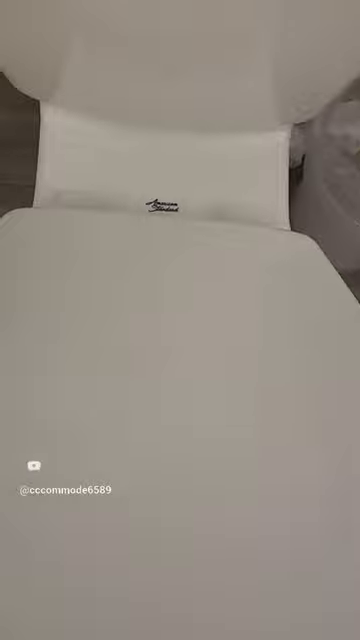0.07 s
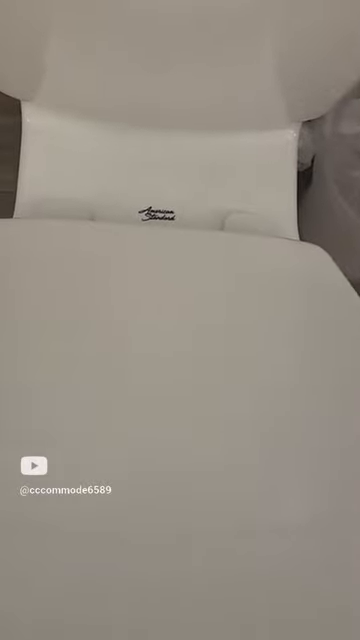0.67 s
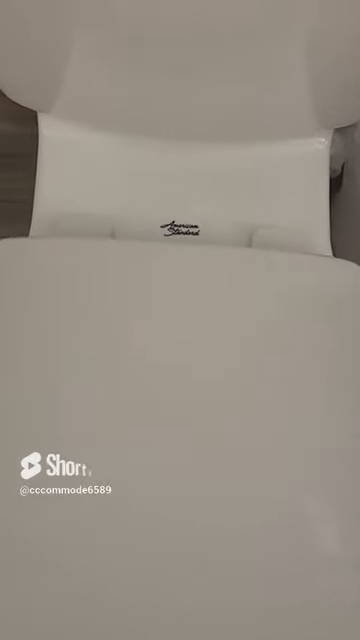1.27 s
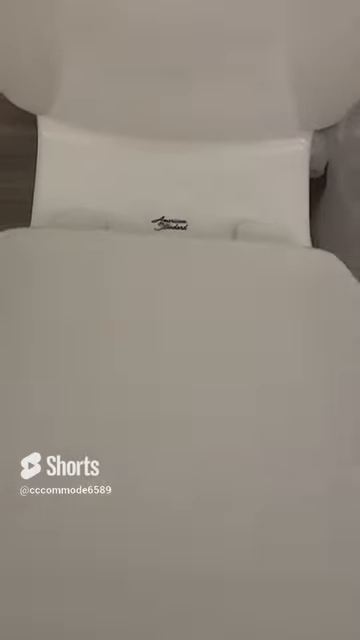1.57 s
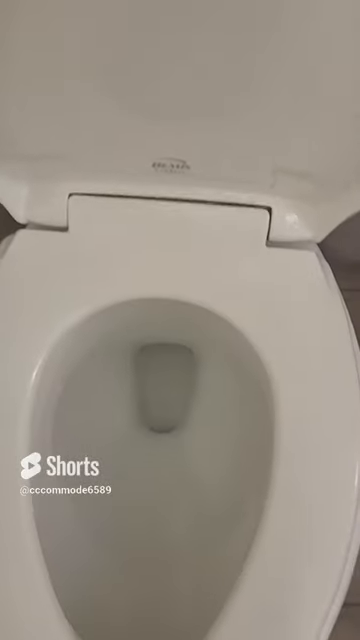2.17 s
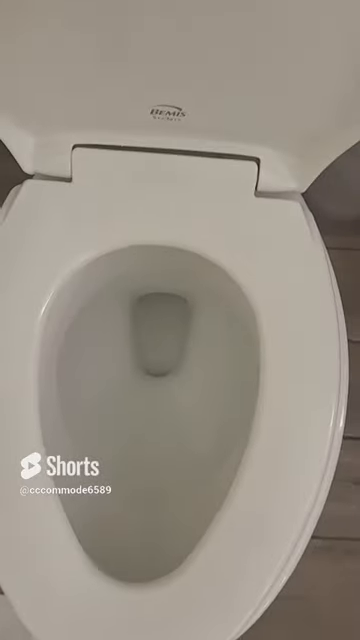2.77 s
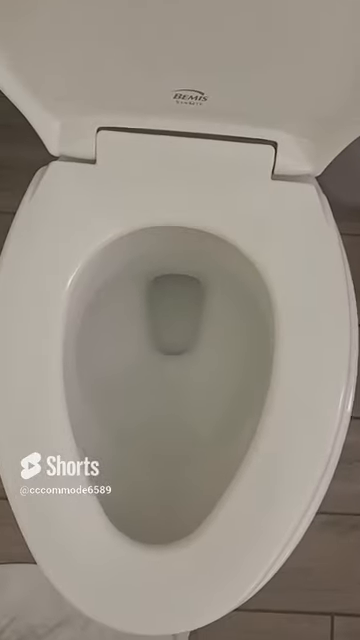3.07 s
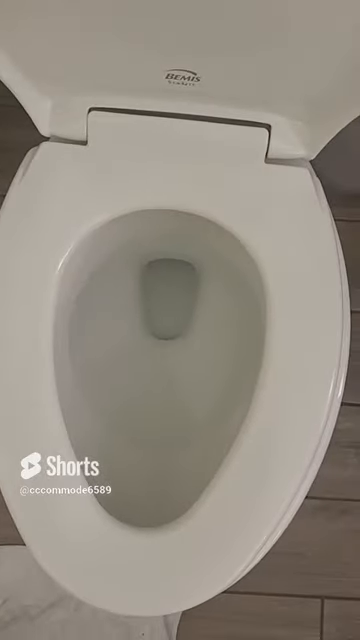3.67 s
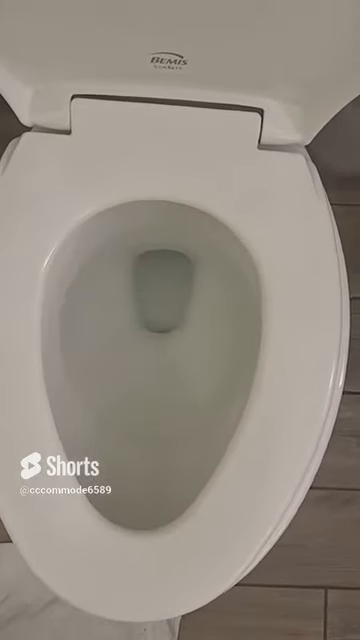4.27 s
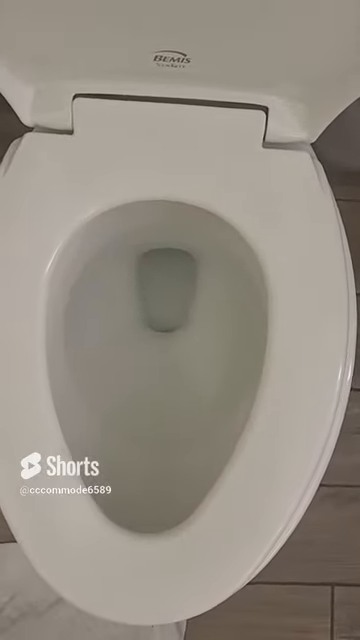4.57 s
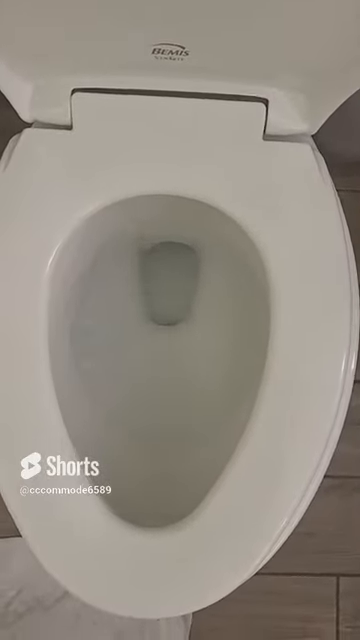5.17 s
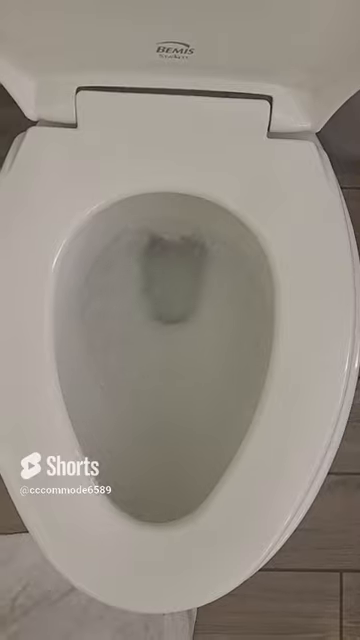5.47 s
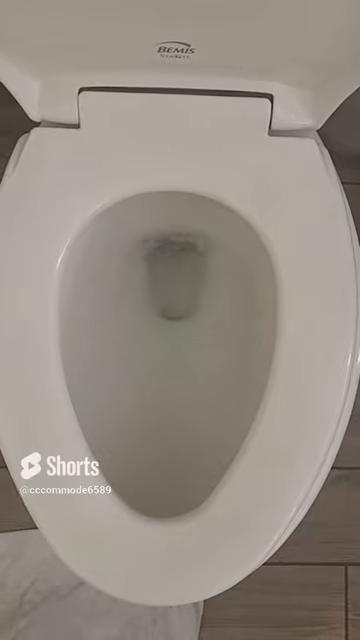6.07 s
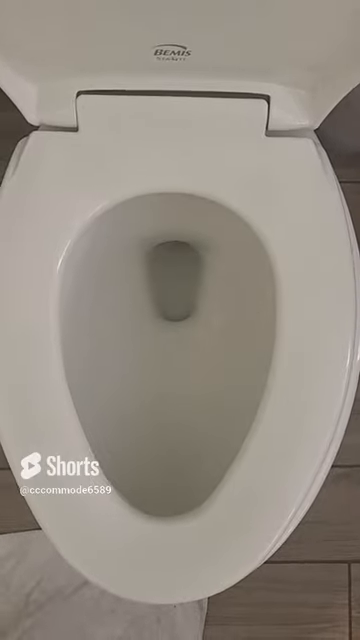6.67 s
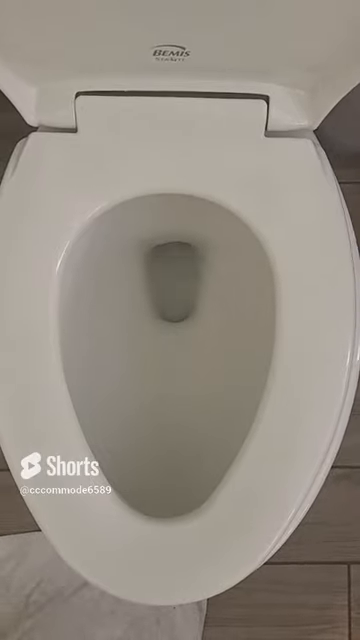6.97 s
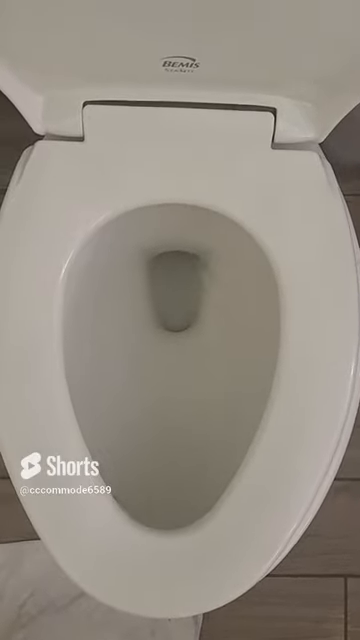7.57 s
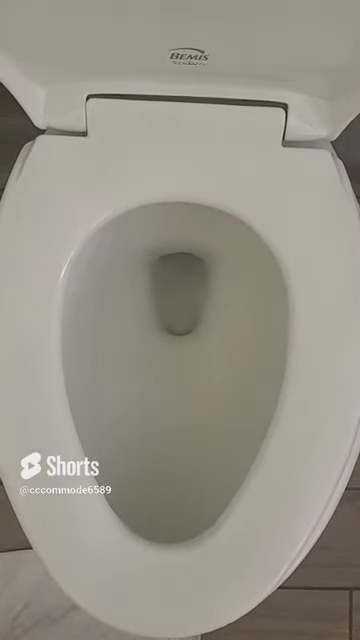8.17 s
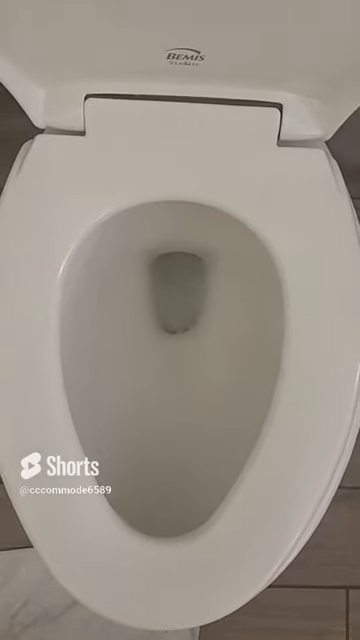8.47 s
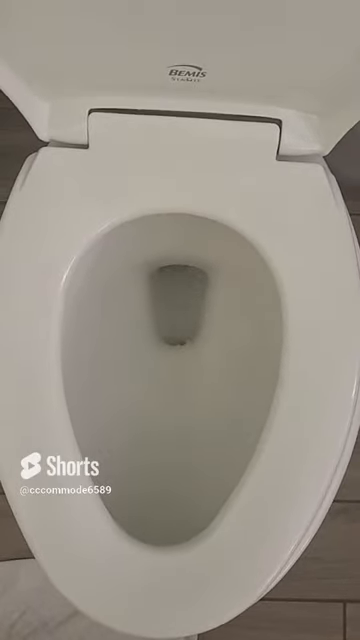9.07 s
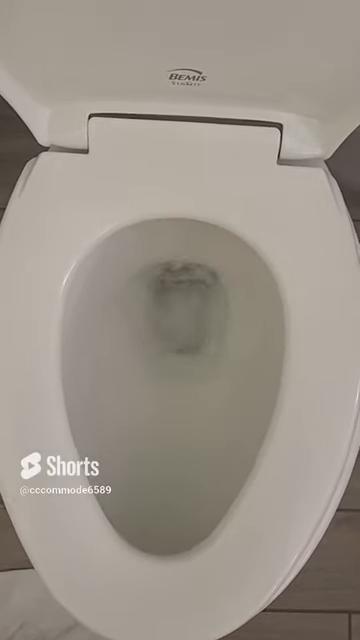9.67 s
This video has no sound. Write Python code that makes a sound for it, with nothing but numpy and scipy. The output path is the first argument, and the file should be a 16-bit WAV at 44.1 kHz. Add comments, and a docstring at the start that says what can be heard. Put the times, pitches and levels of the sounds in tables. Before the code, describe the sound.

In a small bathroom a fan drones steadily under a thin, bright hiss. A plastic toilet lid knocks once against the porcelain tank. After a pause the toilet flushes: a low rumble and gurgle lead into two surges of splashing water, then the siphon gulps air amid pops and spattering drops, and the flow dies away. The sound is close, and muffled on the left side.

```python
"""Toilet lid and flush

In a small bathroom a fan drones under a bright hiss, and the left channel is muffled. A raised lid
knocks against the tank and rings in its damped modes. Then the toilet flushes: slugs of water make
the trap boom, two surges splash into the bowl, the siphon gulps air and the flow dies away. Most of
the water's sound comes from bubbles, damped oscillators that ring higher the smaller they are."""
import sys
import numpy as np
from scipy import signal
from scipy.fft import rfft, irfft
from scipy.io import wavfile
from scipy.ndimage import uniform_filter1d

SR = 44100
rng = np.random.default_rng(int(sys.argv[2]) if len(sys.argv) > 2 else 0)


def transcribe(signal):
    """Save signal, clipped to [-1, 1], as a 16-bit WAV file at the path in sys.argv[1]."""
    frames = np.atleast_2d(signal).T
    limited = np.clip(frames, -1, 1)
    pcm = np.round(limited * 32767).astype(np.int16)
    wavfile.write(sys.argv[1], SR, pcm)


N = 432621
TIME = np.arange(N) / SR

FLUSH_S, DRAIN_FROM_S, DRAIN_TO_S = 4.25, 6.3, 7.52
FAN_DB, USUAL_STREAM_DB = -39, -33

# Levels in the tables are relative; each source adds its own gain.
# Reverberation time of the room: f/Hz, T60/s
ROOM_DECAY = [(100, 0.42), (400, 0.41), (1000, 0.27), (4000, 0.34), (14000, 0.14)]
# Left-right coherence, clipped in use: f/Hz, coherence
COHERENCE = [(25, 1), (55, 0.86), (95, 1), (130, 0.81), (300, 0.74), (650, 0.17), (1300, -0.067),
             (16000, -1.5)]
# Left channel relative to right: f/Hz, level/dB
LEFT_BALANCE = [(60, 0), (110, 3), (200, 1), (300, -6.5), (480, 0), (900, -3.5), (1300, -6), (1750, -7),
                (2200, -11), (4400, -18.5), (6500, -27.5), (8500, -40), (12500, -28.5), (16000, -31)]
# Spectra of the fan, the hiss, the hand, plastic cracking on porcelain and the trap: f/Hz, level/dB
FAN_SPECTRUM = [(15, -44), (30, -24), (52, -8), (72, 3.5), (95, 4.5), (128, -12), (165, -7), (195, -13),
                (280, -14), (400, -10.5), (650, -15.5), (900, -17), (1100, -21), (2000, -29.5),
                (3500, -39.5), (7000, -56)]
HISS_SPECTRUM = [(1200, -24), (2500, -19.5), (4000, -17.5), (5300, -16), (6500, -17), (7300, -13.5),
                 (7850, -9.5), (8700, -15), (10500, -12), (12000, -5), (13400, 2), (14500, 0), (16000, -8)]
RUB_SPECTRUM = [(500, -27), (1000, -9), (1200, 3), (1550, -7), (2200, -7), (6000, -16)]
CRACK_SPECTRUM = [(20, -30), (60, 4), (150, 13), (230, 8.5), (560, 2), (850, 8), (1250, -2), (2200, -1),
                  (3400, -10.5), (4700, -5.5), (7000, -13), (9000, -22), (16000, -40)]
RUMBLE_SPECTRUM = [(20, -21), (55, 3.5), (130, -1), (210, -11), (320, -9), (1000, -68)]
# Resonances of the fan housing: f/Hz, bandwidth/Hz, level/dB
HOUSING_MODES = [(222, 7.4, 9.5), (791.5, 11, 8), (874, 13.4, 6.5), (1444, 63, 4.5)]
# Envelope of the hiss: t/s, level/dB
HISS_LEVEL = [(0.3, -30.5), (1.46, -29.5), (3.29, -33), (3.82, -31), (6.46, -33.5), (6.65, -30.5),
              (7.31, -30.5), (7.81, -34), (7.84, -29), (8.37, -33.5), (9.67, -33), (9.8, -32)]
# Impacts of the chattering lid on the tank: t/s, level/dB
LID_KNOCKS = [(2.5195, -8), (2.5219, -13.5), (2.5256, -12), (2.530, -17), (2.556, -25)]
# Modes of the lid: f/Hz, level/dB, T60/s
LID_MODES = [(80, -7, 0.14), (150, -3, 0.17), (233, -17, 0.28), (425, -17, 0.2), (563, -10.5, 0.35),
             (611, -5.5, 0.26), (781, -26, 0.16), (840, -1, 0.038), (886, -26, 0.08), (1290, -21, 0.07),
             (1644, -18, 0.05), (1930, -17, 0.04), (2230, -21, 0.045), (2770, -24, 0.06), (3700, -33, 0.1)]
# Strength of the stream on the porcelain and of the churn in the bowl's throat: t/s, level/dB
STREAM_LEVEL = [(4.3, -72), (4.45, -57), (4.8, -48.5), (5.02, -46), (5.18, -32.5), (5.42, -32.5),
                (5.49, -40.5), (5.58, -38.5), (5.68, -35.5), (5.89, -35), (6.0, -47.5), (6.2, -58.5),
                (6.37, -54), (6.44, -35.5), (6.62, -34), (6.8, -33.5), (6.95, -35.5), (7.44, -38.5),
                (7.49, -45), (7.55, -38), (7.92, -36.5), (8.25, -38), (8.48, -43), (9.2, -49.5),
                (9.45, -62.5), (9.8, -63)]
CHURN_LEVEL = [(4.39, -71), (4.42, -33), (4.52, -45), (4.62, -35.5), (4.82, -30.5), (4.94, -38),
               (5.08, -41.5), (5.17, -31), (5.42, -33), (5.56, -40.5), (5.76, -29), (5.95, -39),
               (6.37, -55), (6.48, -32), (6.9, -28.5), (7.52, -29.5), (7.76, -47), (7.85, -30.5),
               (8.02, -40), (9.3, -47.5), (9.8, -69)]
# Sheets slapping the porcelain, gushes exciting the bowl, slugs in the trap: t/s, level/dB, rise/s
STREAM_SLAPS = [(5.245, -37.5, 0.05), (6.022, -38.5, 0.036), (6.74, -42, 0.051), (7.408, -37, 0.017),
                (7.9, -31, 0.0097), (8.91, -54, 0.029)]
BOWL_GUSHES = [(5.17, -44, 0.015), (5.255, -31, 0.022), (5.34, -33, 0.013), (5.4, -32, 0.015),
               (5.545, -36, 0.014)]
TRAP_SLUGS = [(4.43, -24, 0.042), (4.6, -27.5, 0.059), (4.68, -24, 0.032), (4.77, -19.5, 0.05),
              (4.89, -20.5, 0.045), (4.955, -17.5, 0.046), (5.075, -18.5, 0.034), (5.17, -24, 0.058),
              (5.325, -16, 0.062), (6.15, -28, 0.031), (6.74, -30, 0.03), (6.825, -27.5, 0.028),
              (7.11, -31.5, 0.037), (7.25, -34, 0.029), (7.885, -15.5, 0.033)]
# Filters that shape the bubble clouds: f/Hz, level/dB
SPRAY_SPECTRUM = [(2500, -11.5), (4800, -1), (6200, -12), (7100, -2.5), (8100, -3.5), (9200, -12),
                  (11000, -6), (13000, 6), (16000, -24)]
RUSH_SPECTRUM = [(900, 2), (2000, -5.5), (2700, 2.5), (3200, -0.5), (4200, -2.5), (5200, -9), (6500, -7),
                 (10000, -16), (16000, -31)]
SPLASH_SPECTRUM = [(500, -10), (1200, -10.5), (1550, -1.5), (1850, -3), (2250, 3), (2700, -13), (4500, -17),
                   (9000, -24), (16000, -34)]
SLOSH_SPECTRUM = [(400, -14), (560, 0), (620, 0.5), (740, 6), (860, 0.5), (1020, 3.5), (1150, 2.5),
                  (1350, -2.5), (1600, -12.5), (2500, -39)]
GURGLE_SPECTRUM = [(150, -54), (195, -16), (225, -2), (255, -1), (290, -0.5), (320, -0.5), (365, -3),
                   (420, -5.5), (520, -7.5), (700, -23.5)]
# Standing waves between bowl and walls; air modes over the full bowl: f/Hz, bandwidth/Hz, level/dB
STANDING_WAVES = [(230.5, 10, 7.5), (285, 17, 1.5), (318, 11, 6.5), (374, 4.2, -8), (422.7, 14, 0.5),
                  (570, 4.8, -7), (773, 8, -15), (804, 16, -15), (950, 22, -3), (1478, 21, 6.5),
                  (2130, 21, -11), (2510, 20, -19), (2640, 26, -9)]
BRIM_MODES = [(430, 50, 7), (703, 64, 3.5), (813, 39, 1.5), (1110, 60, 0.5), (1396, 110, 3.5),
              (1765, 95, 2), (2115, 190, 4), (2460, 70, -2), (2850, 230, -0.5), (3930, 3000, 1)]
# Cavity modes: f full/Hz, f drained/Hz, stage half-width/Hz, level full/dB, level drained/dB
BOWL_MODES = [(694, 787, 66, -5, -6), (1083, 1005, 18, 1, -0.5), (1408, 1490, 41, -16, -7),
              (2120, 2290, 78, -4, -5)]
# Ring of the cavity relative to the stream: t/s, level/dB
BOWL_RING_LEVEL = [(5.08, -25), (5.22, -1.5), (5.45, -6), (5.65, -15), (5.95, -13), (6.55, -2.5),
                   (7.5, -3.5), (8.3, -1), (9.2, 2)]
# Drops smacking wet porcelain: t/s, level/dB, f/Hz
DROP_IMPACTS = [(5.474, -25, 5500), (6.489, -26, 9200), (6.594, -19, 7050), (6.693, -24, 3723),
                (6.996, -21, 4654), (7.019, -26, 4580), (7.192, -21, 5800), (7.256, -19.5, 5780),
                (7.364, -19, 3490), (7.4228, -17, 3920), (7.516, -23, 5100), (7.575, -16.5, 5330),
                (7.598, -16.5, 5346), (7.619, -29, 6570), (7.6635, -20, 5300), (7.666, -15, 10900),
                (7.753, -21.5, 5310), (7.842, -22, 4410), (7.873, -18, 4360), (7.921, -10, 7110),
                (7.923, -9.5, 11200), (7.983, -24, 4370), (8.067, -18, 8950), (8.155, -22, 7800),
                (8.365, -26, 4250), (8.539, -28, 6840), (8.617, -25, 5040), (8.715, -28, 6540),
                (8.85, -30, 6500), (8.92, -26, 4790)]
# Air and water spitting from the jet and rim holes: t/s, level/dB, f/Hz, bandwidth/Hz, half-length/s
HOLE_SQUIRTS = [(4.479, -48.5, 1180, 400, .04), (4.576, -35.5, 527, 70, 0.041),
                (4.629, -48, 1140, 450, 0.14), (4.654, -34, 510, 90, 0.022), (4.983, -34, 487, 110, 0.021),
                (5.28, -25, 12600, 3000, 0.014), (5.384, -32, 425, 60, 0.043),
                (5.648, -36, 3570, 1800, 0.025), (5.705, -31, 6950, 3500, 0.014),
                (5.832, -32.5, 7200, 1800, 0.02), (5.866, -31, 7760, 2200, 0.023),
                (5.967, -35, 7500, 1400, 0.01), (6.081, -41, 726, 220, 0.023), (6.155, -40, 505, 60, .015),
                (6.34, -45, 3600, 1410, 0.01), (6.425, -34, 3400, 1280, 0.029),
                (6.443, -31, 4080, 220, .017), (6.55, -30.5, 2420, 1300, 0.032),
                (6.694, -31, 3380, 2200, 0.035), (6.785, -30, 2960, 790, .024),
                (6.87, -34, 2900, 503, 0.013)]
# Bursting bubbles: t/s, level/dB, f/Hz, relative spray level/dB
BUBBLE_BURSTS = [(5.159, -22, 650, -25), (5.47, -16, 2120, -3), (5.81, -20, 780, -20),
                 (6.456, -22, 1180, -18), (6.947, -14, 1000, -7), (6.968, -20, 1240, -16),
                 (7.029, -14, 770, -1), (7.07, -15, 766, -15), (7.131, -17, 7130, -20),
                 (7.197, -14, 714, -18), (7.237, -18, 980, -19), (7.391, -15, 760, -20),
                 (7.415, -18, 1100, -16), (7.422, -18, 2300, 3), (7.518, -20.5, 2220, -2),
                 (7.637, -17, 950, -20), (7.693, -13, 810, -20), (7.822, -18, 511, -20),
                 (7.84, -12.5, 773, -2), (7.892, -21, 633, -18), (7.908, -16.5, 986, -20),
                 (7.912, -20, 1480, -15), (7.918, -16, 1858, -15), (7.924, -18, 2367, -15),
                 (7.952, -24, 1350, -20), (8.097, -13.5, 779, -16), (8.171, -13.5, 915, -17),
                 (8.28, -20.5, 763, 4), (8.352, -21, 755, -14)]
# Nominal pitch of the large bubbles, highest at each surge and as the siphon breaks: t/s, f/Hz
GURGLE_PITCH = [(5.05, 300), (5.35, 400), (5.75, 310), (6.48, 375), (6.8, 292.6), (7.68, 295), (7.82, 440),
                (7.95, 440), (8.2, 305), (9.4, 301.2)]
# Air gulped through the trap: t/s, level/dB, f/Hz, decay/periods
SIPHON_GULPS = [(4.424, -21, 297, 1.7), (4.612, -16.5, 313, 2.8), (4.702, -19, 246, 1.7),
                (4.753, -15, 320, 2), (4.806, -18, 314, 1.6), (4.853, -15, 323, 2.8), (4.938, -29, 366, 2),
                (5.73, -19.5, 295, 7), (5.765, -18, 320, 6.6), (5.817, -26, 318, 3.3),
                (5.871, -20.5, 321, 4.7), (6.176, -24, 350, 1.9), (6.613, -13.5, 318, 2),
                (6.637, -12.5, 275, 1.7), (6.744, -13.5, 305, 2), (6.846, -8, 271, 3.4),
                (6.926, -11.5, 326, 1.6), (6.984, -9, 281, 2.8), (7.088, -11, 310, 5.2),
                (7.16, -12.5, 286, 2.6), (7.277, -18, 273, 2), (7.341, -18, 326, 2), (7.404, -8, 284, 1.5),
                (7.434, -2, 313, 3.4), (7.466, -8.5, 319, 2.2), (7.494, -12, 266, 2),
                (7.524, -19, 298, 2.6), (7.598, -15.5, 253, 2.5), (7.63, -12, 294, 1.7),
                (9.021, -24, 293, 3.5), (9.341, -24.5, 303, 2.9)]


def amp(db):
    """Amplitude ratio of a level in decibels."""
    return 10 ** (np.asarray(db) / 20)


def unit_rms(x):
    """Normalisation to unit mean power."""
    return x / np.sqrt(np.mean(x ** 2) + 1e-20)


def noise(n=N):
    """Gaussian white noise."""
    return rng.standard_normal(n)


def at_hz(points, hz):
    """Interpolation on a logarithmic frequency axis."""
    f, value = np.transpose(points)
    return np.interp(np.log(hz + 1), np.log(f + 1), value)


def curve(points):
    """Linear interpolation in time, held at the ends."""
    return np.interp(TIME, *np.transpose(points))


def add(mix, s, sound):
    """Superposition of a sound starting at time s."""
    part = mix[round(s * SR):][:len(sound)]
    part += sound[:len(part)]


def swells(rows):
    """Sum of envelopes that each rise to a peak and decay."""
    out, t = np.zeros(N), np.arange(SR // 2) / SR
    for s, db, rise_s in rows:
        add(out, s, amp(db) * (t / rise_s * np.exp(1 - t / rise_s)) ** 2)
    return out


def drift(hz):
    """Random modulation of unit rms and a bandwidth of about hz."""
    n = N // 64
    lowpass = np.exp(-(np.fft.rfftfreq(n, N / SR / n) / hz) ** 2)
    slow = unit_rms(irfft(rfft(noise(n)) * lowpass, n))
    return np.interp(TIME, np.linspace(0, N / SR, n), slow)


def steadied(x, seconds):
    """Division by the running rms, which leaves only the faster fluctuations."""
    power = uniform_filter1d(np.atleast_2d(x ** 2).mean(0), int(seconds * SR))
    return x / np.sqrt(uniform_filter1d(abs(power), int(seconds * SR / 2)) + 1e-12)


def colour(x, spectrum):
    """Minimum-phase filtering to a spectrum of f/Hz, level/dB."""
    log_gain = np.log(amp(at_hz(spectrum, np.fft.rfftfreq(8192, 1 / SR))))
    mirrored = np.r_[log_gain, log_gain[-2:0:-1]]
    taps = np.fft.ifft(np.exp(np.conj(signal.hilbert(mirrored)))).real
    return signal.oaconvolve(x, taps[:len(taps) // 2])[:len(x)]


def highpass(x, hz):
    """Fourth-order attenuation below hz."""
    return signal.sosfilt(signal.butter(4, hz, "highpass", fs=SR, output="sos"), x)


def resonate(x, hz, width_hz):
    """Forced response of one resonator with unit peak gain."""
    return signal.lfilter(*signal.iirpeak(hz, hz / width_hz, SR), x)


def modal(x, modes):
    """Forced response of resonators in parallel."""
    return sum(amp(db) * resonate(x, hz, width) for hz, width, db in modes)


def ringing(x, modes):
    """Superposition of the direct sound and its resonances."""
    return x + modal(x, modes)


def gliding(x, hz, width_hz):
    """Two resonant stages in cascade, each width_hz wide, tuned along the curve hz."""
    carrier = np.exp(2j * np.pi * np.cumsum(hz) / SR)
    pole = np.exp(-np.pi * width_hz / SR)
    baseband = signal.lfilter([(1 - pole) ** 2], [1, -2 * pole, pole ** 2], x / carrier)
    return 2 * (carrier * baseband).real


def diffuse(a, b):
    """A diffuse field at two nearby points: independent signals made partly coherent."""
    coherence = np.clip(at_hz(COHERENCE, np.fft.rfftfreq(len(a), 1 / SR)), -1, 1)
    left = irfft(coherence * rfft(a) + np.sqrt(1 - coherence ** 2) * rfft(b), len(a))
    return np.array([left, a])


def room(x, wet_db):
    """Reverberation: the dense echoes of a small hard room decay exponentially."""
    hz, t, spectra = signal.stft(noise((2, SR // 2)), SR, nperseg=256)
    decay = amp(-60 * t / at_hz(ROOM_DECAY, hz)[:, None])
    tails = signal.istft(spectra * decay, SR, nperseg=256)[1]
    onset = np.clip(np.arange(tails.shape[1]) / SR / 0.0014 - .5, 0, 1)
    tails = diffuse(*(tails * onset))
    echoes = signal.oaconvolve(x[None], tails / np.linalg.norm(tails[1]), axes=1)[:, :N]
    return (x + amp(wet_db) * echoes) / np.sqrt(1 + amp(wet_db) ** 2)


def fan():
    """Low broadband noise drives the resonances of the fan housing."""
    sides = [ringing(colour(noise(), FAN_SPECTRUM), HOUSING_MODES) for side in range(2)]
    return amp(FAN_DB + 0.77 * drift(3.5)) * unit_rms(diffuse(*sides))


def hiss():
    """Bright noise, incoherent between the channels, flickers by random amplitude modulation."""
    sides = np.array([colour(noise(), HISS_SPECTRUM) for side in range(2)])
    return amp(curve(HISS_LEVEL) + 1.58 + 0.94 * drift(18)) * unit_rms(sides)


def hand():
    """Friction: a hand reaching for the lid makes a faint, brief rub."""
    rub = colour(noise() * amp(3.9 * drift(60)), RUB_SPECTRUM)
    envelope = np.exp(-((TIME - .76) / 0.046) ** 2)
    return room(amp(-46.5) * unit_rms(rub) * envelope, wet_db=-5)


def lid():
    """Impact excitation: each knock gives a click, a short crack and the free vibration of the lid."""
    knocks, t = np.zeros(N), np.arange(SR // 2) / SR
    ring = sum(amp(db - 60 * t / t60) * np.sin(2 * np.pi * hz * t) for hz, db, t60 in LID_MODES)
    for s, db in LID_KNOCKS:
        contact = signal.unit_impulse(len(t)) + noise(len(t)) * np.exp(-t / 0.0053)
        crack = colour(contact, CRACK_SPECTRUM)
        add(knocks, s, amp(db) * (amp(-6.5) * ring + amp(-2.5) * crack))
    return room(highpass(knocks, hz=42), wet_db=-4)


def bubble(hz, cycles, rise, onset):
    """A damped oscillator whose pitch climbs as it nears the surface; cycles and onset count periods."""
    periods = np.arange(int(6 * cycles * SR / hz)) * hz / SR
    envelope = np.exp(-periods / cycles) * (1 - np.exp(-periods / onset))
    phase = 2 * np.pi * periods * (1 + rise * periods / cycles / 2)
    return envelope / envelope.max() * np.sin(phase)


def bubbles(low_hz, high_hz, per_s, cycles, rise, spread_db, sizes):
    """Superposition of bubbles born at random from the start of the flush onward."""
    n = N - int(FLUSH_S * SR)
    born = rng.random(n) < per_s / SR
    level_db = spread_db * np.minimum(rng.exponential(1, n), 4)
    size = rng.integers(0, sizes, n)
    kicks = born * amp(level_db) * rng.choice([-1, 1], n)
    cloud = np.zeros(n)
    for k, hz in enumerate(np.geomspace(low_hz, high_hz, sizes)):
        cloud += hz * signal.oaconvolve(kicks * (size == k), bubble(hz, cycles, rise, onset=0.14))[:n]
    return np.r_[np.zeros(N - n), unit_rms(cloud)]


def stream_db():
    """Drive on the porcelain: the amplitudes of the stream and its slaps add."""
    return 20 * np.log10(amp(curve(STREAM_LEVEL)) + swells(STREAM_SLAPS))


def drained():
    """Emptied fraction of the bowl, from 0 to 1."""
    return np.clip((TIME - DRAIN_FROM_S) / (DRAIN_TO_S - DRAIN_FROM_S), 0, 1)


def flow_gain(drive_db, full_db, drained_db, slope):
    """Amplitude as a power law of the drive, with an offset that shifts as the bowl drains."""
    offset_db = full_db + (drained_db - full_db) * drained()
    return amp(USUAL_STREAM_DB + slope * (drive_db - USUAL_STREAM_DB) + offset_db)


def drips():
    """As the bowl drains, drops strike the shallow water and excite tiny damped notes."""
    notes = bubbles(2296, 8770, per_s=73, cycles=15, rise=0.017, spread_db=4, sizes=22)
    return amp(curve(STREAM_LEVEL) - 10) * drained() * steadied(room(notes, wet_db=-5), 0.14)


def spray():
    """Impacts of flying droplets make fine, high ticks."""
    ticks = bubbles(3588, 15020, per_s=3100, cycles=24, rise=0.0063, spread_db=4.5, sizes=28)
    ticks = colour(ticks * amp(3.8 * drift(40)), SPRAY_SPECTRUM)
    gain = flow_gain(stream_db(), full_db=-4.5, drained_db=-1, slope=0.74)
    return gain * steadied(room(ticks, wet_db=-5.5), 0.58)


def spatters(decay_s=0.0025, q=3.9):
    """The impact of a flung drop is a crisp noise burst in a heavily damped resonance."""
    out, t = np.zeros(N), np.arange(SR // 20) / SR
    for s, db, hz in DROP_IMPACTS:
        smack = resonate(noise(len(t)) * np.exp(-t / decay_s), hz, hz / q)
        add(out, s, amp(db) * smack / abs(smack).max())
    return room(out, wet_db=0.5)


def squirts():
    """Air and water forced through holes give band noise: a gargle at the jet, a whistle at the rim."""
    out, t = np.zeros(N), np.arange(-SR // 8, SR // 8) / SR
    for s, db, hz, width, half_s in HOLE_SQUIRTS:
        band = resonate(resonate(noise(len(t)), hz, width), hz, 2 * width)
        add(out, s + t[0], amp(db) * unit_rms(band) * np.exp(-(t / half_s) ** 2))
    return room(out, wet_db=-2.5)


def pops(piece_span_s=0.04, piece_spread=0.37):
    """Fragmentation: a bubble bursts with a note and a puff of spray into four of similar pitch."""
    out, t = np.zeros(N), np.arange(SR // 10) / SR
    spray_band = signal.butter(2, [2500, 9000], "bandpass", fs=SR, output="sos")
    puff_envelope = np.exp(-t / 0.013) * (1 - np.exp(-t / 0.0024))
    for s, db, hz, spray_db in BUBBLE_BURSTS:
        puff = signal.sosfilt(spray_band, noise(len(t)) * puff_envelope)
        add(out, s, amp(db - 5.5) * bubble(hz, cycles=hz * 0.0048, rise=0.0066, onset=0.77))
        add(out, s, amp(db + spray_db - 7.5) * puff)
        for late, pitch in rng.random(size=(4, 2)):
            piece = bubble(hz * np.exp(piece_spread * (pitch - .4)), cycles=3.2, rise=0.013, onset=0.54)
            add(out, s + piece_span_s * late, amp(db - 14 - 9.7 * late) * piece)
    return room(out, wet_db=-3)


def bowl_cavity(waver_share=0.048, gush_hz=1076):
    """Cavity resonance: patter and gushes ring the air in the bowl, whose modes shift as it drains."""
    patter = noise() * amp(7 * drift(26))
    empty, ring = drained(), np.zeros(N)
    waver = 1 + waver_share * empty * drift(29.4)  # the shallow water rocks
    for full_hz, drained_hz, half_width, full_db, drained_db in BOWL_MODES:
        hz = (full_hz + (drained_hz - full_hz) * empty ** 2) * waver
        note = gliding(patter, hz, 2 * half_width)
        ring += amp(full_db + (drained_db - full_db) * empty) * steadied(note, 0.18)
    gain = amp(curve(STREAM_LEVEL) + curve(BOWL_RING_LEVEL)) * (TIME > FLUSH_S)
    gushes = swells(BOWL_GUSHES) * steadied(gliding(patter, np.full(N, gush_hz), width_hz=55), .05)
    return gain * steadied(room(ring, wet_db=-3), 0.093) + room(gushes, wet_db=-4)


def brimming(x, ends_s=6.56, fade_s=0.56):
    """Air resonances over the full bowl filter the splashing, and fade as the siphon takes hold."""
    full = np.clip((ends_s - TIME) / fade_s, 0, 1)
    return (1 - full) * x + full * modal(x, BRIM_MODES)


def rush():
    """The rim jets entrain tiny bubbles, whose notes merge into a dense fizz."""
    fizz = bubbles(1838, 6860, per_s=6000, cycles=8.7, rise=0.016, spread_db=4.5, sizes=24)
    fizz += amp(-10) * noise()
    fizz = colour(fizz * amp(4.4 * drift(44)), RUSH_SPECTRUM)
    gain = flow_gain(stream_db(), full_db=-2.85, drained_db=-4, slope=1.06) * (TIME > FLUSH_S)
    return gain * steadied(room(fizz, wet_db=-2.5), 0.041)


def splash():
    """Water breaking on the porcelain entrains small bubbles in quick clumps."""
    cloud = bubbles(1029, 5280, per_s=1500, cycles=9.4, rise=0.015, spread_db=5.5, sizes=32)
    cloud = colour(cloud * amp(2 * drift(39)), SPLASH_SPECTRUM)
    gain = flow_gain(stream_db(), full_db=-2.5, drained_db=-1.3, slope=0.93)
    return gain * steadied(room(ringing(cloud, STANDING_WAVES), wet_db=10), 0.15)


def slosh(churn_share=0.36):
    """Meeting streams entrain middle-sized bubbles, which excite the standing waves."""
    cloud = bubbles(472, 2150, per_s=2000, cycles=6, rise=0.044, spread_db=3, sizes=32)
    cloud = ringing(colour(cloud, SLOSH_SPECTRUM), STANDING_WAVES)
    drive_db = churn_share * curve(CHURN_LEVEL) + (1 - churn_share) * curve(STREAM_LEVEL)
    gain = flow_gain(drive_db, full_db=-4.5, drained_db=0.52, slope=1)
    return gain * steadied(room(cloud, wet_db=-0.5), 0.1)


def gurgle():
    """Large bubbles resonate in the throat of the bowl, higher in pitch when they are smaller."""
    cloud = bubbles(192.2, 695, per_s=300, cycles=3.65, rise=0.016, spread_db=0, sizes=24)
    cloud = colour(cloud, GURGLE_SPECTRUM)[int(FLUSH_S * SR):]
    speed = curve(GURGLE_PITCH) / 305  # scales every frequency in the cloud
    churn = np.interp(np.cumsum(speed) % len(cloud), np.arange(len(cloud)), cloud)
    churn = ringing(highpass(churn, hz=223), STANDING_WAVES)
    gain = amp(curve(CHURN_LEVEL) - 1 + 1.8 * drift(12)) * (TIME > FLUSH_S)
    return gain * steadied(room(churn, wet_db=-4.5), 0.18)


def gulps():
    """The siphon draws in air as single large bubbles, each ringing for a few periods."""
    out = np.zeros(N)
    for s, db, hz, cycles in SIPHON_GULPS:
        add(out, s, amp(db - 4.5) * bubble(hz, cycles, rise=0.0049, onset=0.64))
    return room(highpass(out, hz=230), wet_db=-5)


def trap(full_hz=95.9, full_db=-19, sag_hz_per_db=0.9):
    """Forced oscillation: slugs and churn drive the trap on a low note that sags as it weakens."""
    drive = amp(curve(CHURN_LEVEL) - 8.5) * (TIME > FLUSH_S) + amp(-0.5) * swells(TRAP_SLUGS)
    weakness_db = np.clip(full_db - 20 * np.log10(drive + 1e-9), 0, 21)
    hz = full_hz - sag_hz_per_db * weakness_db
    periods = np.cumsum(hz) / SR + 0.075 * drift(6.6)  # the note wavers
    tone = np.sqrt(2) * np.sin(2 * np.pi * periods)
    rumble = unit_rms(colour(noise(), RUMBLE_SPECTRUM))
    boom = drive * amp(-2.5 + 0.59 * drift(3.8)) * (tone + amp(-15.5) * rumble)
    return highpass(boom, hz=42)


def scene():
    """Superposition of the background, the lid and the water."""
    water = trap() + gurgle() + gulps() + brimming(slosh() + splash() + rush())
    water += spray() + squirts() + drips() + bowl_cavity() + pops() + spatters()
    return fan() + hiss() + hand() + lid() + water


def record(dry, start_s=0.255, edge_hz=15950):
    """Channel filtering: the left loses its treble; both start abruptly and are band-limited."""
    hz = np.fft.rfftfreq(N, 1 / SR)
    ratio = amp(at_hz(LEFT_BALANCE, hz))
    coherence = np.clip(at_hz(COHERENCE, hz), 0, 1)
    right = 2 / np.sqrt(1 + ratio ** 2 + 2 * coherence * ratio)  # keeps the level of the pair's mean
    heard = irfft(rfft(dry) * np.array([ratio * right, right]), N)
    heard *= np.clip((TIME - start_s) / 0.011, 0, 1)
    lowpass = signal.firwin(511, edge_hz, window=("kaiser", 9), fs=SR)
    return signal.oaconvolve(heard, lowpass[None], "same")


dry = scene()
out = record(dry)
transcribe(out)
```